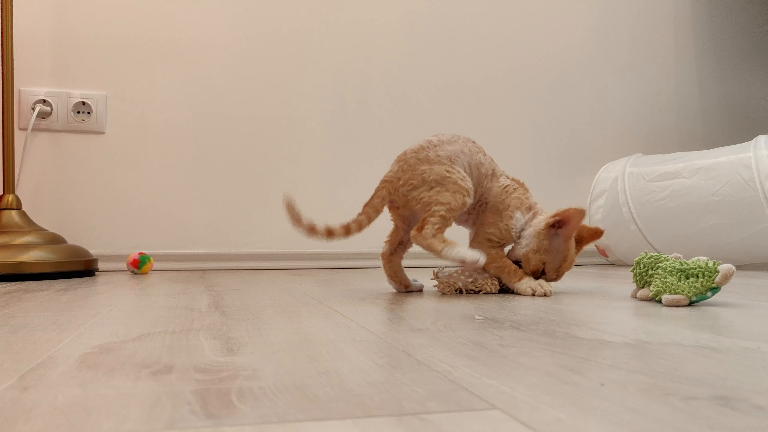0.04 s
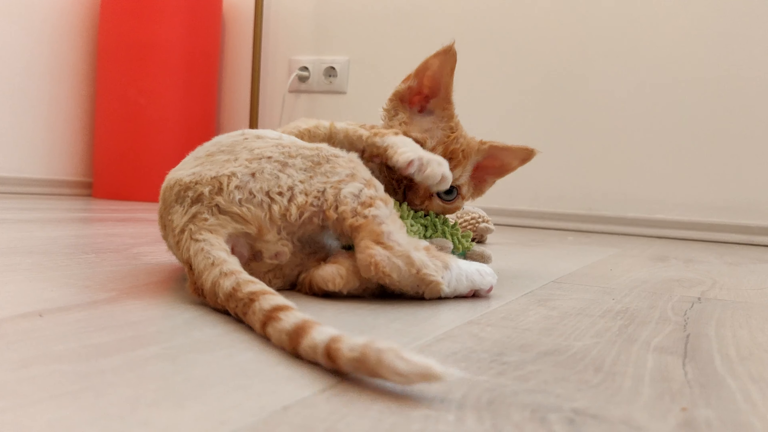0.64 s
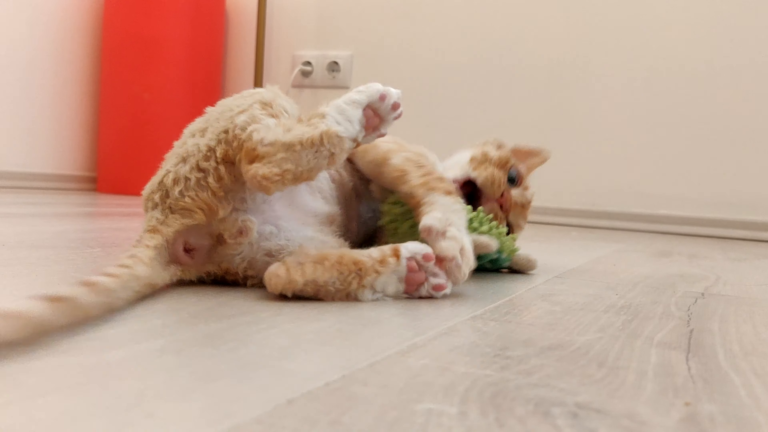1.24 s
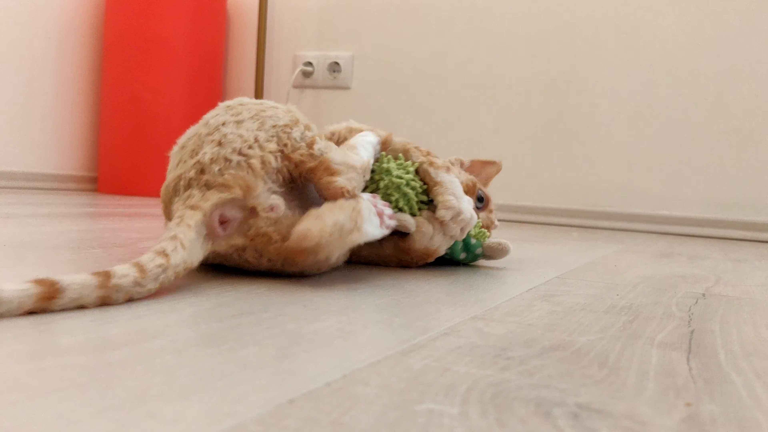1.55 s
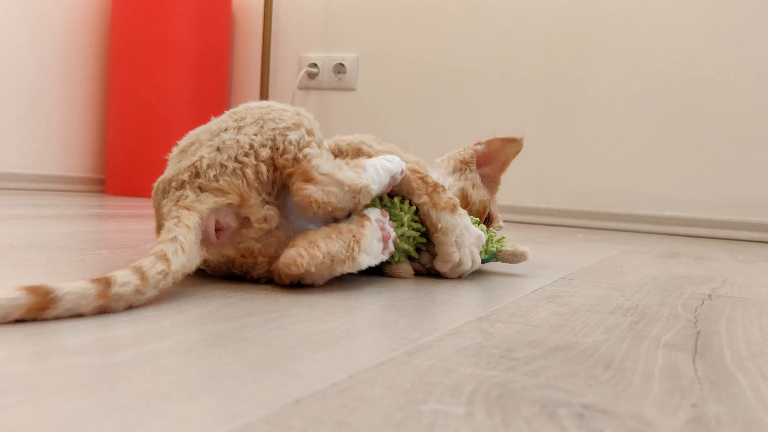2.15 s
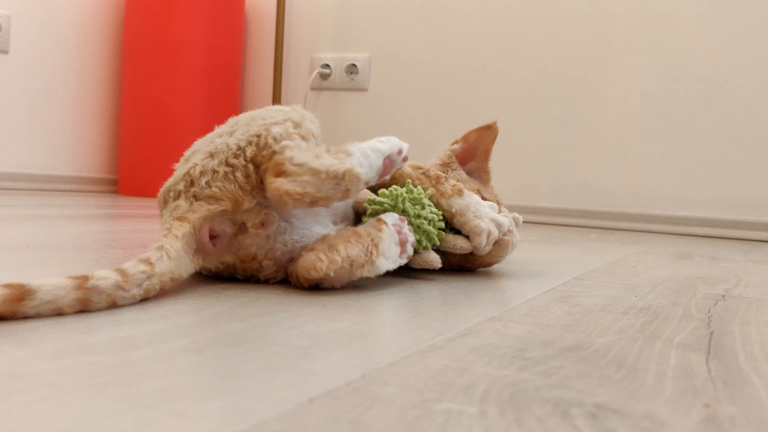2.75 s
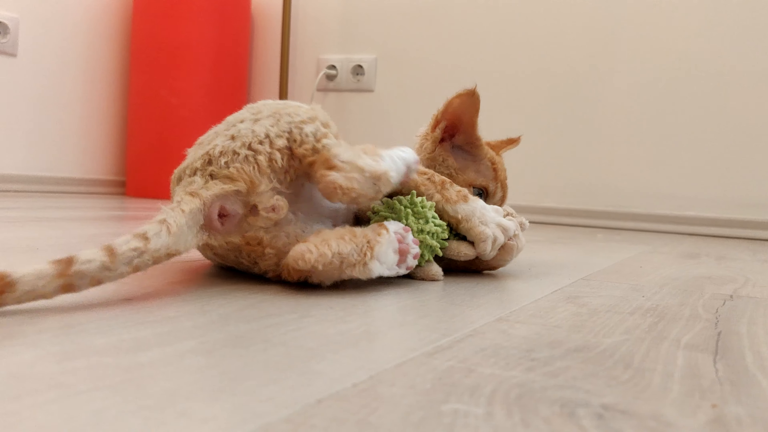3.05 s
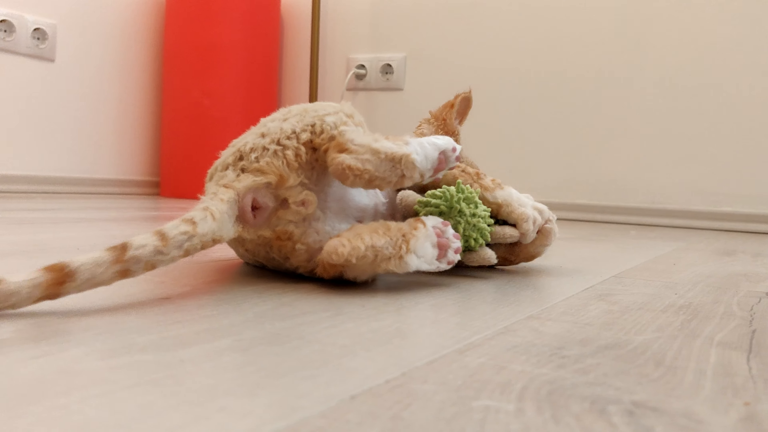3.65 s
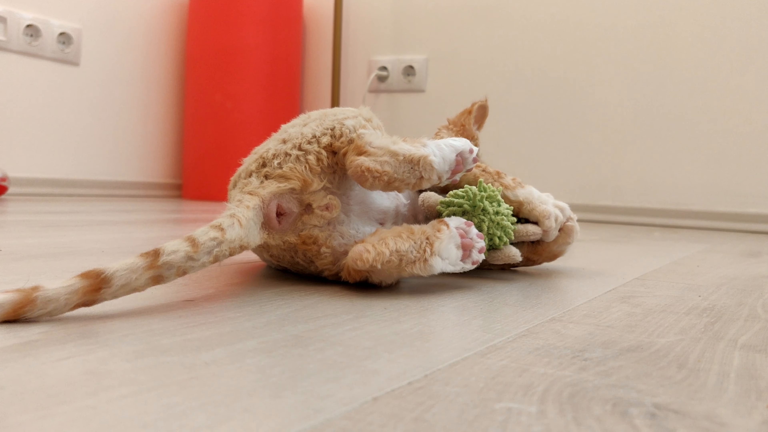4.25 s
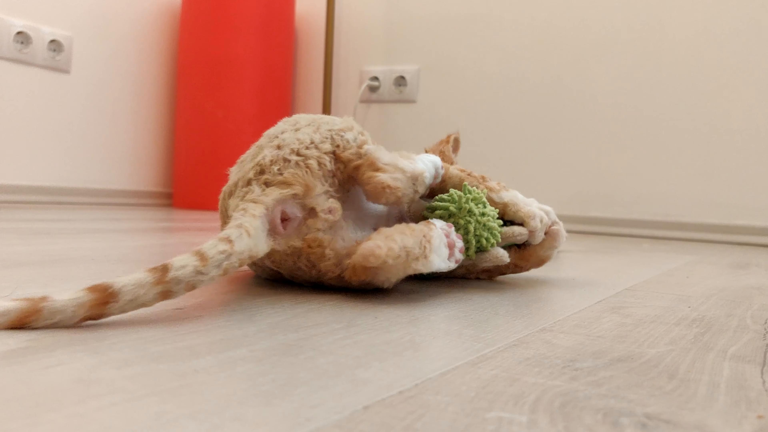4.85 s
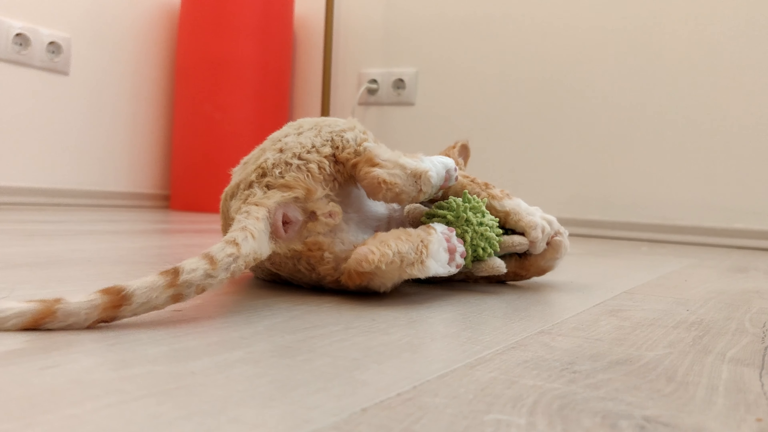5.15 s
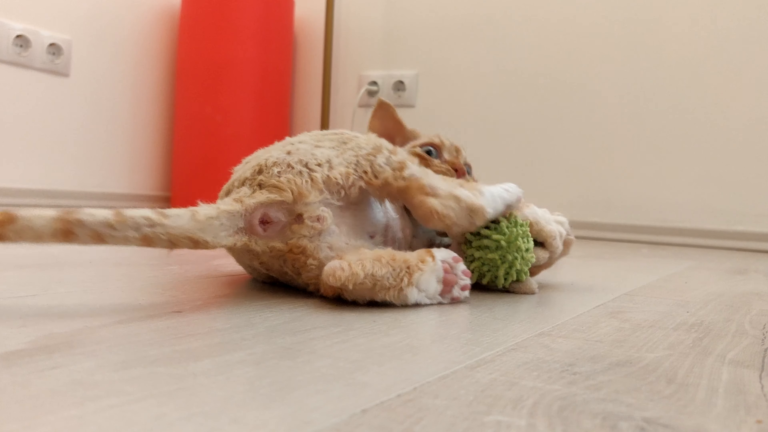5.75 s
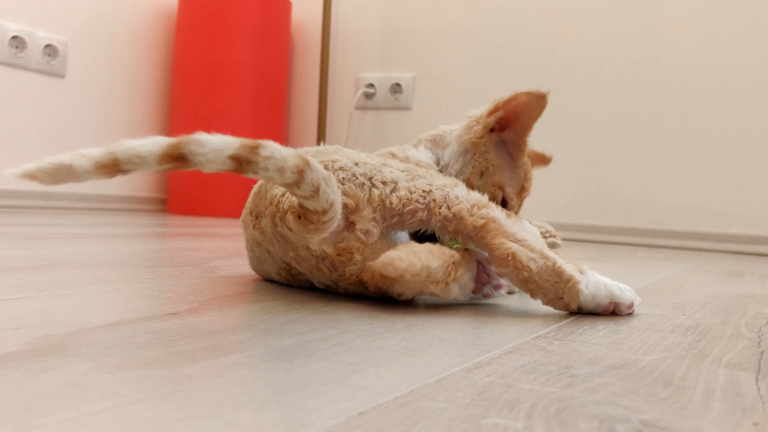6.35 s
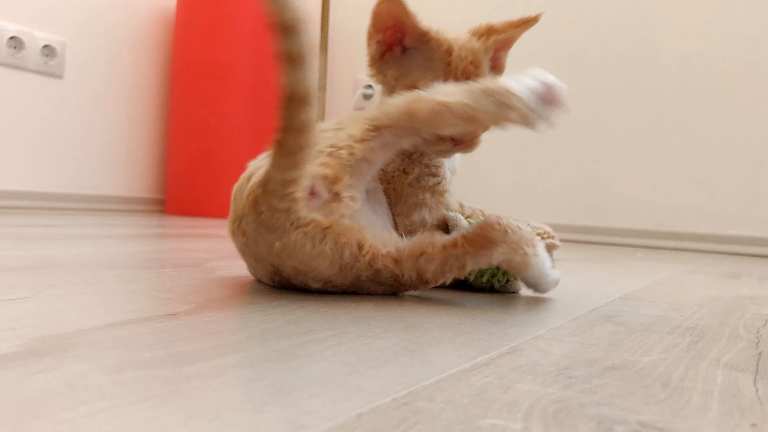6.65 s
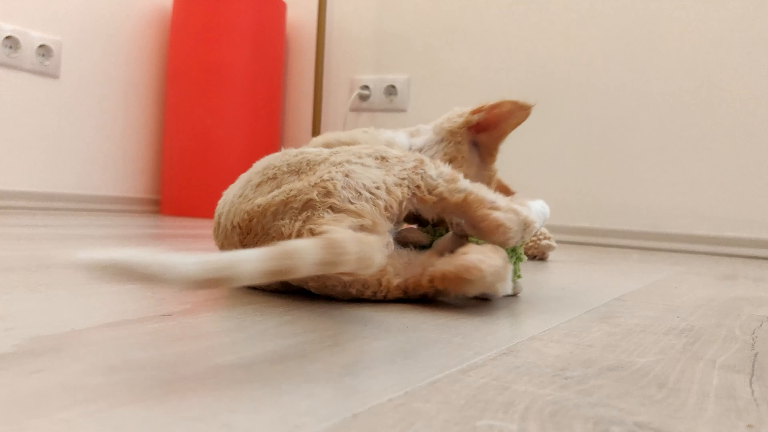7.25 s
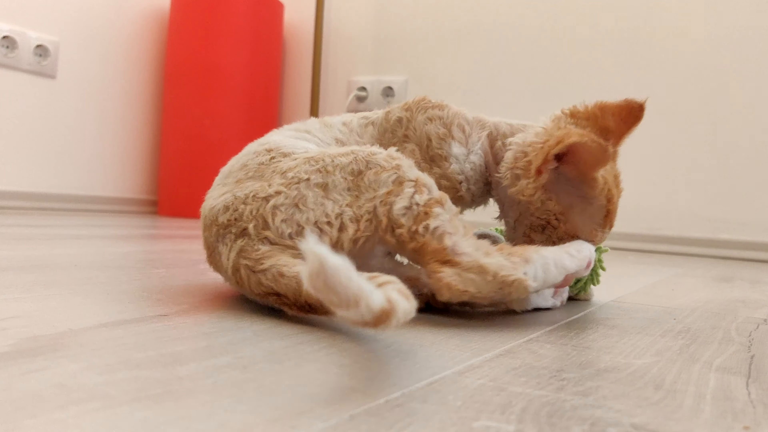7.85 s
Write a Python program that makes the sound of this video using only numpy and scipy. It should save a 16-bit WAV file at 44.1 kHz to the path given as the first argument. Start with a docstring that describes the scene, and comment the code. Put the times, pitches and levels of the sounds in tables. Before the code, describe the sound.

Paws and fur scuffle on a hard floor for the first 0.3 seconds, then a faint, low appliance hum comes in and stays. A kitten grabs and kicks a plush toy, and the foil inside snaps and crackles in close, irregular bursts, loudest around 1.3, 2 and 2.5 seconds. Near 2.7 seconds the kitten's body bumps softly on the floor. From about 3 to 4.5 seconds it gnaws with small, soft knocks and a few stray ticks of foil. A lull follows, with little but the hum and room tone. At about 5.8 seconds a second bout of crackling begins, now mixed with hissy swishes of plush, a few knocks and light skids on the floor. It dies away just before 8 seconds. The bare room adds a short ring to the sharper snaps.

```python
"""Kitten with a crinkly toy

A kitten wrestles a plush toy on a hard floor in a bare room. Paws scuffle in a quieter room; then the scene
changes, and a faint appliance hum is heard. In two bouts of kicking, the foil in the toy buckles in snaps and
crackles, and in the second the plush swishes too; in the calm between them the kitten gnaws with soft knocks."""
import sys
import numpy as np
from scipy import signal
from scipy.fft import rfft, irfft
from scipy.io import wavfile

SR = 44100
rng = np.random.default_rng(int(sys.argv[2]) if len(sys.argv) > 2 else 0)


def dump_mix(stems):
    """Bounce the given channels to the path in sys.argv[1] as a 16-bit WAV at rate SR."""
    frames = np.atleast_2d(stems).T  # one column per channel
    limited = np.clip(frames, -1, 1)  # hard clip at full scale
    pcm = np.round(limited * 32767).astype(np.int16)
    wavfile.write(sys.argv[1], SR, pcm)


N = 357651


def amp(db):
    return 10 ** (np.asarray(db) / 20)


def unit_rms(x):
    return x / np.sqrt(np.mean(x ** 2) + 1e-20)


def spectrum_at(points, hz, column=1):
    """A spectrum table at the given frequencies."""
    points = np.array(points, float)
    return np.interp(np.log(hz + 1), np.log(points[:, 0] + 1), points[:, column])


def add(mix, start_s, sound):
    part = mix[..., max(round(start_s * SR), 0):][..., :sound.shape[-1]]
    part += sound[..., :part.shape[-1]]


def drift(rate_hz):
    """A smooth random wobble of unit size, up to about the given rate."""
    hz = np.fft.rfftfreq(N, 1 / SR)
    return unit_rms(irfft(rfft(rng.standard_normal(N)) * np.exp(-(hz / rate_hz) ** 2) * (hz > 0), N))


def stereo_noise(colour, likeness):
    """Noise of a given spectrum and left-right likeness."""
    hz = np.fft.rfftfreq(N, 1 / SR)
    left, other = rfft(rng.standard_normal((2, N)))
    same = np.clip(spectrum_at(likeness, hz), -1, 1)
    right = same * left + np.sqrt(1 - same ** 2) * other
    return unit_rms(irfft(np.array([left, right]) * amp(spectrum_at(colour, hz)), N))


# Partials of the appliance hum: f/Hz, level/dB
HUM_PARTIALS = [(73.7, -47.5), (221, -49.5), (294.7, -60)]
# Colour of the room tone: f/Hz, relative level/dB
ROOM_TONE = [(12, -34), (20, 3), (49, -9.5), (86, -9), (146, -15), (222, -14.5), (422, -20), (780, -23),
             (1220, -28), (2080, -31.5), (6180, -30.5), (9400, -42.5), (16000, -37)]
# Stereo image of room tone and floor rub: f/Hz, left-right correlation
STEREO_LIKENESS = [(30, 0.65), (200, 0.82), (600, 0.32), (1500, 0)]


def background(hum_start_s=0.28, tone_db=-44, early_db=-4, waver_db=1.0, fade_db_per_s=0.95):
    """Under the opening scuffle the room tone is quieter and there is no hum; at 0.28 s the scene changes, and
    a wavering appliance hum is heard over a fuller room tone, its lowest partial slowly fading."""
    t = np.arange(N) / SR
    on = np.clip((t - hum_start_s) * 20 + 0.5, 0, 1)
    offset = np.array([[0], [0.04]])  # standing waves reach left and right at different phases
    partials = []
    for hz, db in HUM_PARTIALS:
        peak = amp(db + waver_db * drift(21)) * np.sqrt(2)
        cycles = hz * t + 0.026 * drift(2.0) + offset
        partials.append(peak * np.sin(2 * np.pi * cycles))
    hum = partials[0] * amp(fade_db_per_s * (t.mean() - t)) + sum(partials[1:])
    tone = amp(tone_db + early_db * (1 - on)) * stereo_noise(ROOM_TONE, STEREO_LIKENESS)
    return hum * on * amp([[1.7], [-1.7]]) + tone


# Reverb time of the bare room: f/Hz, T60/s
ROOM_DECAY = [(200, 0.79), (800, 0.17), (2000, 0.51), (5000, 0.48), (8000, 0.49), (15000, 0.13)]


def room(send, predelay_s=0.00022, build_s=0.0012):
    """Bare walls and a hard floor: a dense tail, each band dying at its own speed."""
    t = np.arange(SR) / SR
    taps = rng.standard_normal((2, SR)) * (rng.random((2, SR)) < 0.15)
    taps *= np.clip((t - predelay_s) / build_s, 0, 1)
    hz, age, bands = signal.stft(taps, SR, nperseg=256)
    decay = amp(-60 * age / spectrum_at(ROOM_DECAY, hz)[:, None])
    tail = signal.istft(bands * decay, SR, nperseg=256)[1]
    return signal.fftconvolve(np.atleast_2d(send), tail / np.linalg.norm(tail[0]), axes=1)[:, :N]


# How tightly the kitten holds the toy: t/s, level/dB
GRIP_LEVELS = [(0, -47), (0.55, -57), (1.55, -42.5), (2.25, -53), (2.7, -44.5), (3.6, -67.5), (5.8, -56.5),
               (6.15, -39.5), (8.1, -56.5)]


def grip_db():
    """The grip tightens in each bout and slackens between them."""
    times, levels = np.array(GRIP_LEVELS, float).T
    return np.interp(np.arange(N) / SR, times, levels)


def stroke(start, hold, attack_s=0.0055, relax_db_per_s=436):
    """Envelope of one push: the paws press quickly and hold, then the toy settles."""
    t = np.arange(N) / SR - start
    return np.clip(t / attack_s, 0, 1) * amp(-relax_db_per_s * np.clip(t - hold, 0, 1))


# Skids and rolls on the floor: t/s, hold/s, level/dB
FLOOR_SKIDS = [(0.046, 0.23, -44), (0.11, 0.09, -44), (0.244, 0.041, -40), (1.23, 0.22, -49),
               (2.637, 0.061, -52), (5.972, 0.057, -48), (6.808, 0.16, -51), (7.364, 0.062, -50),
               (7.72, 0.1, -48.5)]
# Colour of fur and pads rubbing the floor: f/Hz, relative level/dB
RUB_COLOUR = [(60, -63), (250, 0.5), (450, 1.5), (750, 3), (1200, -7), (2200, -7.5), (5000, -23)]


def floor_rub(uneven_db=2, fidget_db=-11):
    """Fur and pads catch and slip on the floor: faintly as the kitten grips, plainly in each skid."""
    fidget = amp(grip_db() + fidget_db)
    skids = sum(amp(db) * stroke(start, hold) for start, hold, db in FLOOR_SKIDS)
    return stereo_noise(RUB_COLOUR, STEREO_LIKENESS) * (fidget + skids) * amp(uneven_db * drift(26))


# Soft knocks of jaws and paws: t/s, level/dB, f/Hz
JAW_AND_PAW_KNOCKS = [(0.661, -31.5, 720), (1.2085, -21.5, 800), (1.235, -29, 700), (1.276, -20.5, 764),
                      (1.56, -27.5, 725), (1.605, -27, 685), (2.363, -27.5, 740), (2.693, -32.5, 745),
                      (2.843, -27.5, 680), (2.985, -24.5, 780), (3.117, -25, 780), (3.181, -25, 800),
                      (3.231, -27.5, 760), (3.264, -29.5, 776), (3.322, -25, 774), (3.36, -27.5, 720),
                      (3.473, -27.5, 756), (3.696, -29.5, 670), (3.725, -29, 770), (3.848, -24, 740),
                      (3.875, -27, 784), (4.436, -23, 720), (5.564, -35.5, 690), (5.999, -17, 1020),
                      (6.0, -25, 555), (6.683, -25, 824), (6.874, -30.5, 610), (7.081, -28.5, 764),
                      (7.7565, -22.5, 676)]
# The kitten's body bumps the floor: t/s, level/dB, f/Hz
BODY_BUMPS = [(2.65, -35, 188), (2.69, -35, 174), (2.84, -35, 122.5)]


def padded_blows(rows, swell_s, delay_s, edge, touch, grit, gap_swells, sag, vary_db=3):
    """A light first touch, then a short ring with a higher edge; the pitch sags as the padding yields."""
    out, t = np.zeros(N), np.arange(4000) / SR
    for start, db, hz in rows:
        gap, edge_ratio, stretch = rng.uniform([0.7, 1.5, 0.8], [1.4, 2.1, 1.2])
        edge_gain, touch_gain = np.array([edge, touch]) * amp(vary_db * rng.uniform(-1.3, 1, 2))
        ring_s = swell_s * stretch
        parts = ((1, hz, ring_s, start),
                 (edge_gain, edge_ratio * hz, ring_s / np.sqrt(2), start),
                 (touch_gain, hz, ring_s / np.sqrt(2), start - gap * gap_swells * swell_s))
        for gain, pitch, life, when in parts:
            envelope = (t / life / 2) ** 2 * np.exp(2 - t / life)
            cycles = np.cumsum(pitch * (1 + sag * (np.exp(-t / life / 2) - 1 / np.e))) / SR
            ring = np.sin(2 * np.pi * (cycles + rng.random()))
            fabric = grit * rng.standard_normal(len(t))  # the plush rubs under the blow
            add(out, when + delay_s, gain * amp(db) * envelope * (ring + fabric))
    return out


# The room's ring (first row), then plush swishes: peak t/s, rise/s, fall/s, level/dB, centre f/Hz
HISS_SWELLS = [(2.012, 0.0055, 0.11, -36.5, 1980), (6.008, 0.008, 0.021, -38, 6440),
               (6.355, 0.049, 0.039, -35, 5550), (6.622, 0.01, 0.036, -36, 6350),
               (6.838, 0.016, 0.045, -29, 5950), (7.165, 0.029, 0.033, -37, 7360),
               (7.324, 0.004, 0.083, -34, 5300), (7.728, 0.018, 0.0082, -28.5, 4840)]


def hiss_swells(width_octaves=0.53, grain_db=2.5, pan_db=1):
    """Swelling, fading bands of hiss: plush swishes, and the room's hollow ring after the loudest snap."""
    out, t = np.zeros(N), np.arange(N) / SR
    hz = np.fft.rfftfreq(N, 1 / SR) + 1
    for peak_s, rise, fall, db, centre_hz in HISS_SWELLS:
        band = np.exp(-(np.log2(hz / centre_hz) / width_octaves) ** 2 / 2)
        swell = np.exp(-np.maximum((peak_s - t) / rise, (t - peak_s) / fall))
        out += amp(db) * swell * unit_rms(irfft(rfft(rng.standard_normal(N)) * band, N))
    grain = unit_rms(amp(grain_db * drift(600)))
    return out * grain * amp([[pan_db], [-pan_db]])


def facet(hz, q, crack, overtone=0, low_cut_hz=600):
    """One foil facet flips: a crack and a cycle or two of ring, too small to radiate bass."""
    impulse = signal.unit_impulse(256)
    click = crack * unit_rms(impulse)
    for pitch, gain in ((hz, 1), (hz * rng.uniform(0.98, 3.63), overtone * (hz < SR / 10))):
        mode = signal.iirpeak(min(pitch, SR / 4), max(q, 0.6), fs=SR)
        click += gain * unit_rms(signal.lfilter(*mode, signal.lfilter(*mode, impulse)))
    low_cut = signal.butter(2, low_cut_hz, "hp", fs=SR, output="sos")
    return signal.sosfilt(low_cut, unit_rms(click) / np.sqrt(len(click)))


def crackle(low_hz, high_hz, per_s, q, crack, spread_db=5.4, pan_db=3, pitches=14):
    """A steady stream of tiny buckles of many pitches and very unequal sizes."""
    out = np.zeros((2, N))
    for hz in np.geomspace(low_hz, high_hz, pitches):
        at = np.flatnonzero(rng.random(N) < per_s / pitches / SR)
        size = amp(spread_db * np.minimum(rng.exponential(1, N)[at], 2.6))
        side_db = pan_db * rng.standard_normal(N)[at]
        triggers = np.zeros((2, N))
        triggers[:, at] = size * amp([side_db, -side_db])
        out += signal.oaconvolve(triggers, facet(hz, q, crack)[None], axes=1)[:, :N]
    return unit_rms(out)


# Grabs and kicks that crumple the toy: t/s, hold/s, level/dB, share of large dull facets/dB
TOY_SQUEEZES = [(0.29, 0.053, -38.5, -14), (0.846, 0.051, -32, -4), (0.974, 0.057, -35.5, -2.5),
                (1.277, 0.084, -31, -5.5), (1.396, 0.022, -37, 1), (1.492, 0.018, -29.5, -4),
                (1.664, 0.089, -37, -5), (1.997, 0.081, -35.5, -15), (2.406, 0.11, -30, -5.5),
                (2.501, 0.055, -25, -12), (5.815, 0.017, -39, -18), (5.926, 0.043, -36, 3.5),
                (5.996, 0.025, -28.5, -3), (6.307, 0.049, -33, -0.5), (6.44, 0.1, -38.5, 0),
                (6.6, 0.073, -34.5, -9), (6.656, 0.039, -34, 2), (6.724, 0.06, -33, -6),
                (6.803, 0.025, -29, -3.5), (7.124, 0.055, -33, -17), (7.301, 0.073, -36.5, 1),
                (7.403, 0.061, -38.5, -12), (7.538, 0.036, -41.5, -6)]


def foil_crinkle(bright_db=-2, clump_db=2, held_dull_db=-2):
    """Grip and squeezes drive small bright facets and large dull ones; they give way in clumps."""
    bright_power = amp(grip_db()) ** 2
    dull_power = bright_power * amp(held_dull_db) ** 2
    for start, hold, db, dull_db in TOY_SQUEEZES:
        power = (amp(db) * stroke(start, hold)) ** 2
        bright_power += power
        dull_power += power * amp(dull_db) ** 2
    bright = amp(bright_db) * np.sqrt(bright_power) * crackle(4860, 7800, per_s=520, q=0.86, crack=1.0)
    dull = np.sqrt(dull_power) * crackle(1020, 2680, per_s=300, q=0.61, crack=0.071)
    clumps = unit_rms(amp(clump_db * drift(90)))
    return clumps * (bright + dull)


def stray_buckles(per_s=7.2, low_hz=1690, high_hz=6100, above_grip_db=22.5, spread_db=7):
    """Small buckles at random moments, louder under a tighter grip: rows of t/s, level/dB, f/Hz."""
    when, size, pitch = rng.random((round(per_s * N / SR), 3)).T
    at = (when * N).astype(int)
    db = grip_db()[at] + above_grip_db + spread_db * (2 * size - 1)
    return list(zip(at / SR, db, low_hz * (high_hz / low_hz) ** pitch))


def toy_response(t, shiver_s=0.0032, shiver_db=-9.5, fold=0.61, fold_s=0.00035):
    """The foil round a buckle shivers faintly; the folds scatter each click and colour it afresh."""
    shiver = rng.standard_normal((2, len(t))) ** 3 * np.exp(-t / shiver_s)
    shiver *= amp(shiver_db) / np.linalg.norm(shiver, axis=1, keepdims=True)
    scatter = rng.standard_normal((2, len(t))) * np.exp(-t / fold_s)
    response = shiver + fold * scatter / np.linalg.norm(scatter, axis=1, keepdims=True)
    response[:, 0] += np.sqrt(1 - fold ** 2)  # the part that passes straight through
    return response


# Early reflections off the nearest walls: delay/s, level/dB
WALL_ECHOES = [(0.0028, -12), (0.0153, -22)]
# The loudest single buckles of the foil: t/s, level/dB, facet f/Hz
FOIL_BUCKLES = [(0.177, -5, 1900), (0.2974, -5, 3030), (0.3098, -8, 4540), (0.647, -11, 5650),
                (0.683, -14.5, 1840), (0.7364, -15.5, 1910), (0.788, -20, 1900), (0.8375, -15, 2280),
                (0.8503, -14, 5500), (0.8565, -13, 2980), (0.867, -6.5, 2370), (0.8714, -2.5, 7750),
                (0.8887, -2, 5240), (0.896, -2, 2010), (0.9111, 3, 1590), (0.9179, -12, 5000),
                (0.9376, -8.5, 4240), (0.9821, -11, 4830), (0.9937, -9, 2000), (1.0196, -11, 1900),
                (1.0704, -6.5, 2120), (1.0741, -10, 1370), (1.2073, 1, 3800), (1.217, -16, 4540),
                (1.2498, -9.5, 7000), (1.2728, -6, 2830), (1.2881, -7, 5000), (1.2966, -2, 8000),
                (1.3052, -6, 3820), (1.3136, -2.5, 2730), (1.3255, -4, 6200), (1.331, 0.5, 2670),
                (1.3365, -8, 6400), (1.347, -7, 3900), (1.3541, 4.5, 4200), (1.3622, -8, 6500),
                (1.3697, -5, 6000), (1.4093, -6, 5400), (1.4148, 6.5, 1870), (1.4263, -3, 4500),
                (1.4288, 7, 4930), (1.44, -4, 6500), (1.4494, -4, 5400), (1.4888, -2.5, 8900),
                (1.5753, -3, 8700), (1.615, -8.5, 4470), (1.633, -4, 4100), (1.6702, 1.5, 7100),
                (1.707, -7.5, 5600), (1.743, -2, 3300), (1.7522, -7.5, 6400), (1.808, -15.5, 7500),
                (1.9126, -6.5, 2520), (1.981, 4, 2660), (1.9999, 9, 2160), (2.025, -2, 7360),
                (2.0527, -11, 4000), (2.2774, -6.5, 2850), (2.36, -7.5, 6200), (2.3652, -3.5, 5860),
                (2.3868, 4, 8700), (2.3869, -1.5, 1950), (2.409, -8, 5000), (2.4142, -6, 6500),
                (2.421, -8, 1700), (2.4262, -1, 5400), (2.4336, 5, 5000), (2.44, -5, 1700),
                (2.453, -3, 4420), (2.483, -6, 5000), (2.489, -3.5, 1900), (2.4902, -7, 3820),
                (2.5184, -7, 2470), (2.5285, -8, 4500), (2.538, -3.5, 1700), (2.5502, 0, 2320),
                (2.7059, -6, 5040), (2.77, -12.5, 2540), (2.8089, -12, 4200), (2.8972, -21, 4460),
                (2.9306, -16, 9000), (3.0688, -12, 5000), (3.0918, -15, 2000), (3.701, -11.5, 9600),
                (5.8265, -16.5, 5060), (5.923, -19, 4470), (5.9377, -5.5, 2550), (5.9627, -3.5, 2380),
                (5.9863, -4, 5340), (6.0, 0.5, 2260), (6.2469, -8, 1520), (6.2847, -9, 1600),
                (6.307, 0, 1290), (6.326, -1.5, 1850), (6.3614, -8, 1700), (6.4258, -7.5, 1600),
                (6.4668, -12.5, 2400), (6.5023, -3, 1360), (6.5145, -6.5, 6500), (6.574, -15, 4460),
                (6.5908, -5, 2670), (6.6193, -10, 6000), (6.6234, -13, 6000), (6.6586, -8, 1700),
                (6.6838, -4.5, 2000), (6.7553, -9.5, 4800), (6.8138, -7.5, 3380), (6.835, -2.5, 4460),
                (6.9082, -7.5, 2000), (7.0824, -2, 3340), (7.1236, -11, 3280), (7.1305, -1.5, 6700),
                (7.285, -11, 2600), (7.3003, -8.5, 1990), (7.3176, 4, 4570), (7.3588, -4, 5900),
                (7.3738, -10, 2400), (7.5393, -12, 5200), (7.5725, -17, 5600), (7.7714, -14, 1390)]


def foil_snaps(pan_db=0.6, strain_s=0.0006, strain_db=-13, jitter_s=0.0014, send_db=-10.5):
    """Foil strains, flips with a sharp click and echoes off the walls. Returns sound and reverb send."""
    out, send = np.zeros((2, N)), np.zeros(N)
    t = np.arange(1024) / SR
    for start, db, hz in FOIL_BUCKLES + stray_buckles():
        click = amp(db) * facet(hz, q=0.92, crack=0.6, overtone=0.6)
        snap = signal.fftconvolve(toy_response(t), click[None], axes=1)
        snap *= np.linalg.norm(click) / np.linalg.norm(snap, axis=1, keepdims=True)
        pan = amp(pan_db * rng.uniform(-1.1, 1) * np.array([[1], [-1]]))
        add(out, start, pan * snap)
        for delay, wall_db in WALL_ECHOES:
            for side in (0, 1):  # the path changes a little as the toy moves
                add(out[side], start + delay + jitter_s * rng.random(), amp(wall_db) * snap[1 - side])
        # the facet creaks just before it flips
        strain = rng.standard_normal(len(t)) * np.exp(-t[::-1] / strain_s)
        creak = signal.fftconvolve(strain / np.linalg.norm(strain), click)
        add(out, start - len(t) / SR, pan * amp(strain_db) * creak)
        # large dull facets radiate more widely into the room: 3 dB more per octave down
        add(send, start, amp(send_db - 3.0 * np.log2(hz / 3300)) * click)
    return out, send


# Treble colour of the two microphone ports: f/Hz, left level/dB, right level/dB
PORT_EQ = [(3000, 0, 0), (4400, 2, 1), (5600, 6.5, 2), (6400, 11.5, 1.5), (7300, 3, 2.5), (8200, -7, 5.5),
           (9000, -14.5, 7.5), (9700, -23, -3), (10900, -23, -14), (12000, -18, -12), (14000, -12.5, -3)]


def microphone_ports(x, taps=1024):
    """Each port has its own treble resonance: a minimum-phase EQ per side."""
    hz = abs(np.fft.fftfreq(taps, 1 / SR))
    log_gain = np.log(amp([spectrum_at(PORT_EQ, hz, column) for column in (1, 2)]))
    response = np.fft.ifft(np.exp(np.conj(signal.hilbert(log_gain)))).real
    return signal.oaconvolve(x, response, axes=1)[:, :N]


def scene(crinkle_db=-4.5, crinkle_send_db=-6.0, swell_send_db=-8, blow_send_db=-11, hiss_db=-67.5):
    """Toy, kitten, reverb and faint hiss, coloured by the ports, over a bed of hum and room tone."""
    snaps, snap_send = foil_snaps()
    crinkle, swells = foil_crinkle(), hiss_swells()
    knocks = padded_blows(JAW_AND_PAW_KNOCKS, swell_s=0.000492, delay_s=0.0009,
                          edge=0.37, touch=0.83, grit=0.14, gap_swells=4.03, sag=0.14)
    bumps = padded_blows(BODY_BUMPS, swell_s=0.0047, delay_s=0,
                         edge=0.55, touch=0.47, grit=0.11, gap_swells=2.9, sag=0.23)
    blows = knocks + bumps
    close = snaps + amp(crinkle_db) * crinkle + swells + blows + floor_rub()
    reverb = room(snap_send + amp(crinkle_send_db) * crinkle
                  + amp(swell_send_db) * swells + amp(blow_send_db) * blows)
    hiss = amp(hiss_db) * rng.standard_normal((2, N))
    return microphone_ports(close + reverb + hiss) + background()


def record(dry):
    """The sharpest snaps overload; a steep low-pass trims the very top."""
    low_pass = signal.firwin(511, 15950, window=("kaiser", 9), fs=SR)
    return signal.oaconvolve(np.clip(dry, -1, 1), low_pass[None], "same")


dry = scene()
out = record(dry)
dump_mix(out)
```